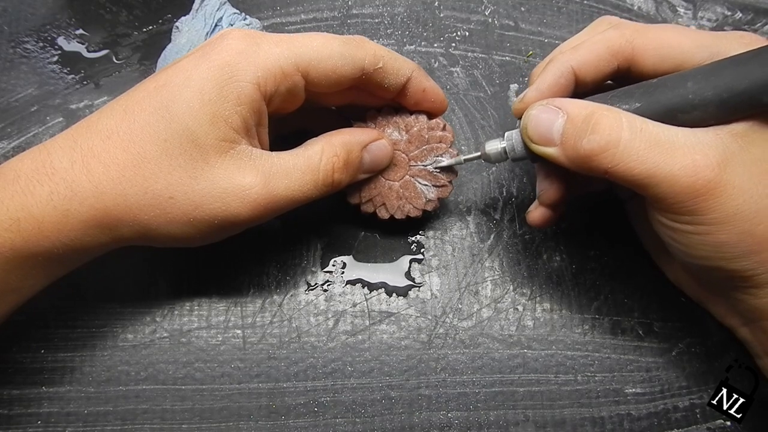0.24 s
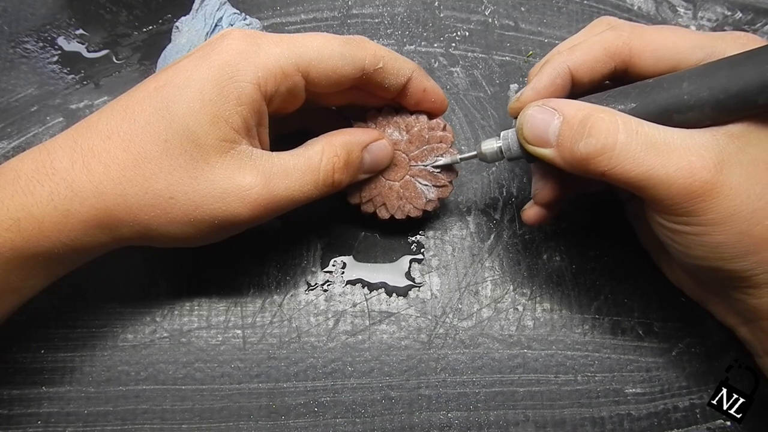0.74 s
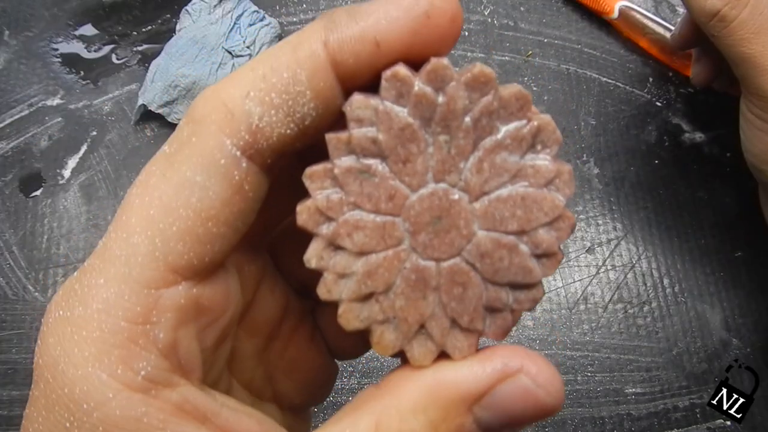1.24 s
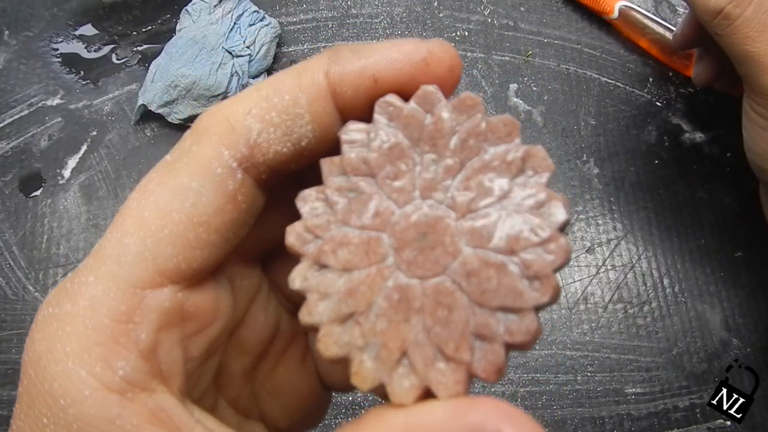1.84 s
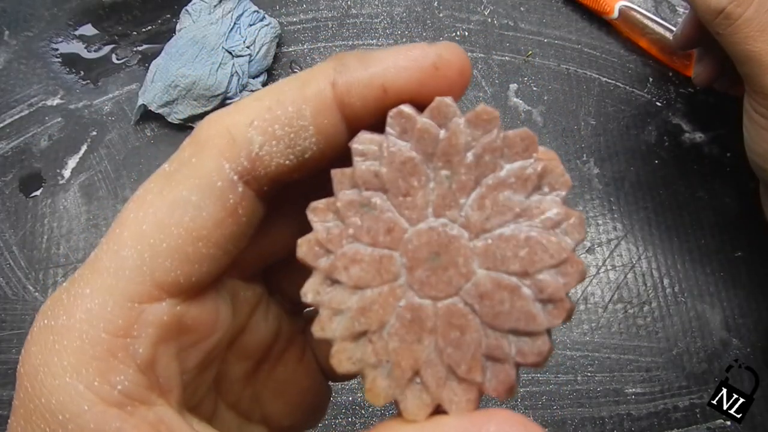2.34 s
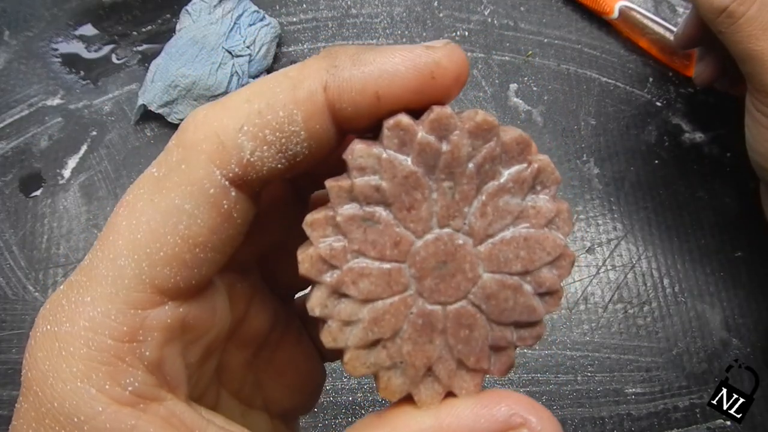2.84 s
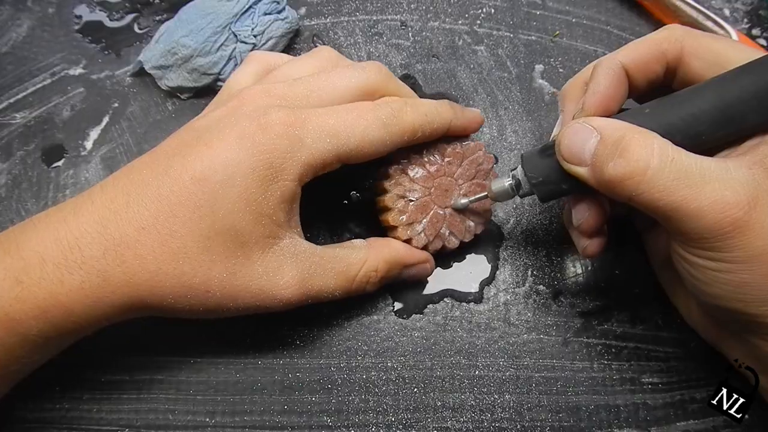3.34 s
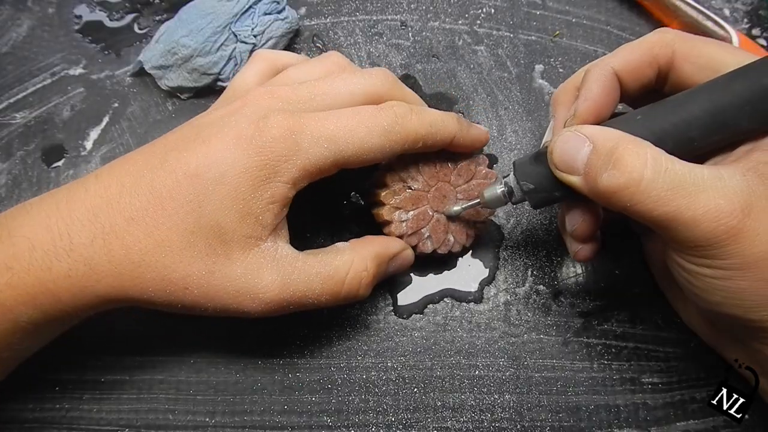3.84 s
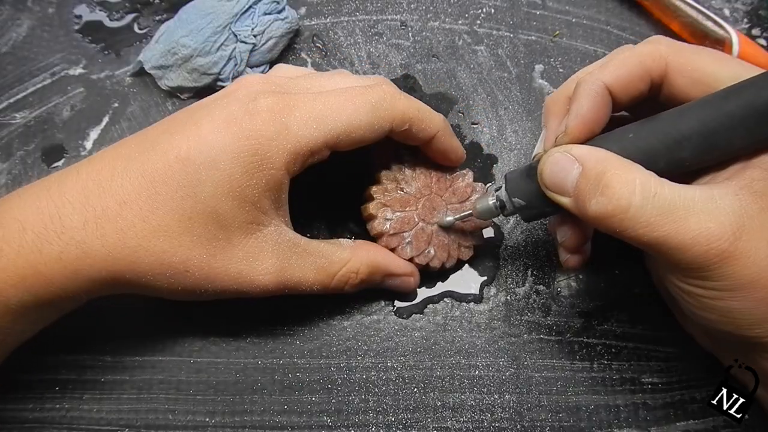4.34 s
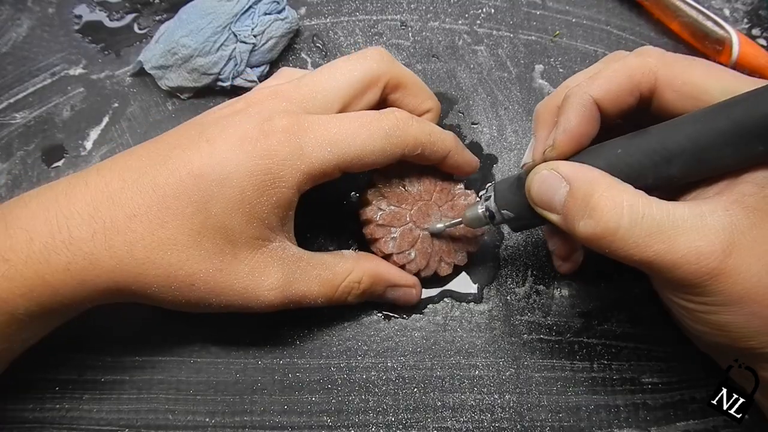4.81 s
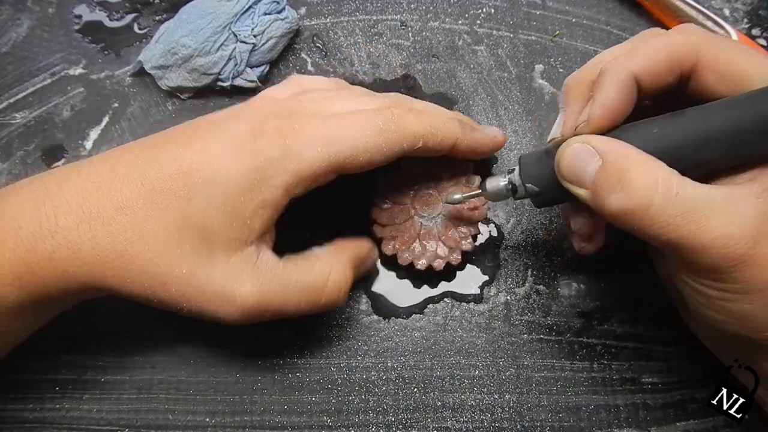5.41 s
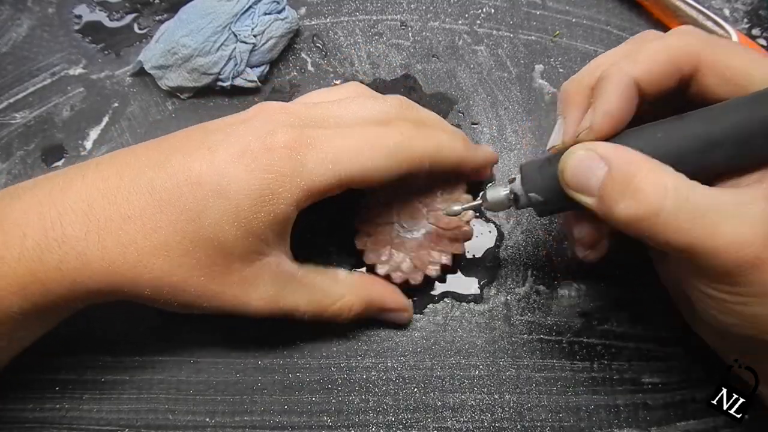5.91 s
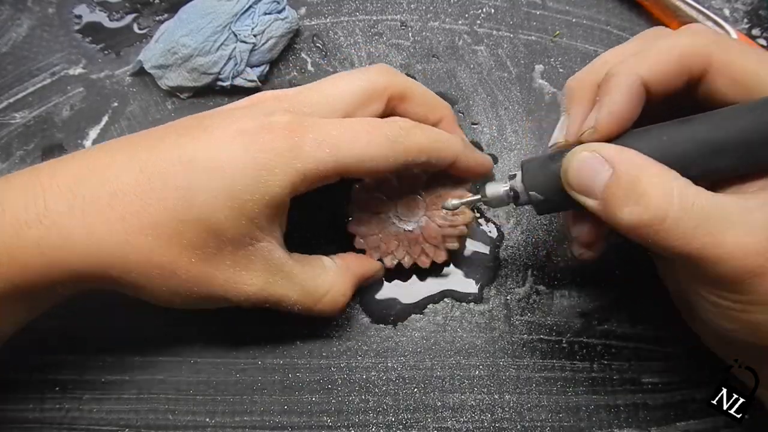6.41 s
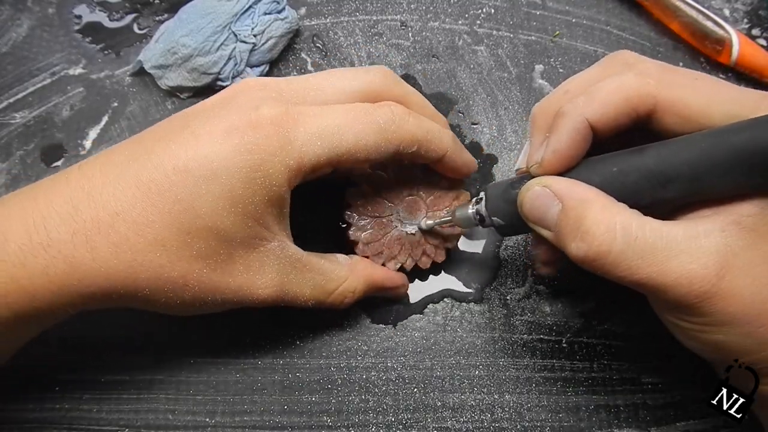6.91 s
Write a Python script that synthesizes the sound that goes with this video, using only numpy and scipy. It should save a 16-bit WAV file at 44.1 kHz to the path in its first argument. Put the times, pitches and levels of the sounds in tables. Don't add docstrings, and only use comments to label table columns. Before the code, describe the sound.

A high-speed handheld grinder drones near 570 hertz with a thin, high motor whine and rough sandy hiss. Three joined passages: a short bright ringing grind, a steady louder buzz, then fluttering drags along grooves with pitch sags and sharp stony rasps. Soft low thuds come from the bench. Close, dry stereo pickup, bright and hissy.

```python
import sys
import numpy as np
from scipy import signal
from scipy.fft import rfft, irfft
from scipy.io import wavfile
from scipy.ndimage import uniform_filter1d

SR = 44100
rng = np.random.default_rng(int(sys.argv[2]) if len(sys.argv) > 2 else 0)


def pcm_store(signal):
    levels = np.round(np.clip(np.atleast_2d(signal), -1, 1) * 32767)
    wavfile.write(sys.argv[1], SR, levels.astype(np.int16).T)


def field_ratio(decibels):
    return 10 ** (np.asarray(decibels, dtype=float) / 20)


N = 315756
HZ = np.maximum(np.fft.rfftfreq(N, 1 / SR), 1)


def unit(x):
    return x / np.sqrt(np.mean(x ** 2))


def on_log(table, column):
    table = np.array(table)
    return np.interp(np.log(HZ), np.log(table[:, 0]), table[:, column])


def colour(spectra, gain):
    return irfft(spectra * gain, N)


def mode(hz, width_hz):
    return 1 / (1 + 1j * (HZ ** 2 - hz ** 2) / (HZ * width_hz))


def walk(rate_hz):
    hold = int(SR / rate_hz)
    held = np.repeat(rng.standard_normal(N // hold + 1), hold)
    slewed = uniform_filter1d(uniform_filter1d(held, hold), hold)[:N]
    return unit(slewed - uniform_filter1d(slewed, 3 * hold))


def lag(x, seconds):
    memory = np.exp(-1 / (seconds * SR))
    return signal.lfilter([1 - memory], [1, -memory], x)


def swells(table):
    t = np.arange(N) / SR
    return sum(db * np.exp(-(2 * (t - s) / length_s) ** 2) for s, db, length_s in table)


def ports(shared, own=None, lead_s=0):
    # frequency in Hz, left minus right in dB, likeness 0-1, left lead in radians.
    port_pair = [(60, -3, .45, 0), (150, -.6, .85, 0), (300, 0, .75, 0), (600, .6, .975, -.1),
                 (2000, 0, .97, -.05), (3100, 0, .75, -.15), (4500, -.5, .6, -.5), (5500, -4.5, .48, -.7),
                 (7000, -2.5, .3, -.8), (7800, -2.5, .4, -2.6), (9000, .8, .55, -4.2),
                 (12200, 2.5, .58, -5.3), (14400, -5, .4, -6.4), (15800, -2, .15, -6.4)]
    likeness = on_log(port_pair, 2)
    side = np.array([[.5], [-.5]])
    lead_rad = on_log(port_pair, 3) + 2 * np.pi * HZ * lead_s
    heard = rfft(shared) * np.exp(1j * side * lead_rad)
    if own is not None:
        heard = np.sqrt(likeness) * heard + np.sqrt(1 - likeness) * rfft(own)
    return heard * field_ratio(side * on_log(port_pair, 1))


def rumble(grit_db, bench_db):
    # frequency in Hz, level in dB per Hz.
    bench_colour = [(12, -43), (20, -13), (102, -11), (171, -6), (190, -11), (250, -35), (420, -120)]
    cage_hz, cage_width_hz, cage_db = 212, 26, -21.5
    noise = rng.standard_normal((6, N))
    cage = colour(ports(noise[0], noise[1:3]), mode(cage_hz, cage_width_hz))
    bumps = field_ratio(4 * walk(20))
    bench = colour(ports(bumps * noise[3], bumps * noise[4:]), field_ratio(on_log(bench_colour, 1)))
    cage_gain = field_ratio(grit_db + cage_db + 1.5 * walk(5.9))
    return cage_gain * unit(cage) + field_ratio(bench_db - 4) * unit(bench)


def strokes():
    # start in s, end in s, final load in Hz of sag.
    drags = [
        (3.1, 3.64, 4.9),
        (3.833, 4.047, 13.9),
        (4.304, 4.551, 9.6),
        (4.704, 5.026, 9.3),
        (5.122, 5.487, 29.6),
        (5.68, 5.966, 34.7),
        (6.226, 6.465, 29.5),
        (6.848, 7.172, 23.8),
    ]
    first_load, edge_s = .46, .02
    contact_lag_s, motor_lag_s = .025, .219
    t, contact, load = np.arange(N) / SR, 0, 0
    for t0, t1, load_hz in drags:
        on = load_hz * np.clip((t - t0) / edge_s, 0, 1) * np.clip((t1 - t) / edge_s, 0, 1)
        contact = contact + on
        load = load + on * (first_load + (1 - first_load) * (t - t0) / (t1 - t0))
    return lag(contact, contact_lag_s), lag(load, motor_lag_s)


def grit(turn, ring_db, air_db, shot):
    # frequency in Hz, dB per Hz in shots 1, 2, 3.
    grit_colour = [(138, -23, -23, -21.5), (440, -7.5, -12, -11.5), (765, -2, -4.5, -5), (1290, 1, -1.5, 0),
                   (2100, 8, 3, 4.5), (3350, 1, 0, -3.5), (3490, 5, 3, 2.5), (5600, -4.5, -3, -6.5),
                   (7300, -9, -4, -2.5), (9200, 0, -1.5, -3.5), (10100, 2, -1.5, -0.5),
                   (12560, 0, -0.5, -3), (14000, -5.5, -8.5, -9), (15900, -14, -12.5, -14)]
    # frequency in Hz, width in Hz, dB in shots 1, 2, 3.
    stone_modes = [(3413, 51, 5.5, -10, -29), (4660, 62, 0, 9, -1), (5567, 53, 0, -20, 13.5),
                   (5540, 1150, -4.5, -22, -4.5), (6264, 170, 3.5, -13, 7.5), (6220, 650, -3.5, -4, -17),
                   (7710, 1070, -10.5, 11, 0.5)]
    flicker_db = [.7, .7, 1.0]
    air_trim_db = [6, 5, 5]
    grains = rng.standard_normal((3, N)) * field_ratio(.5 * rng.exponential(size=(3, N)))
    grains = unit(grains * (1 + .12 * np.cos(2 * np.pi * turn)))
    heard = ports(grains[0], grains[1:])
    tint = field_ratio(on_log(grit_colour, 1 + shot))
    tint = tint / np.sqrt(np.mean(tint ** 2 * (HZ > 2400) * (HZ < 5000)))
    crunch = 0
    for centre_hz in 250 * 2 ** np.arange(0, 6.1, .5):
        octaves_off = abs(np.log2(np.clip(HZ, 250, 16000) / centre_hz))
        share = np.clip(1 - 2 * octaves_off, 0, 1)
        lift_db = air_db + air_trim_db[shot] if centre_hz > 6500 else 0
        crunch = crunch + field_ratio(lift_db + 1.2 * walk(32)) * colour(heard, tint * share)
    ring = 0
    for hz, width_hz, *mode_db in stone_modes:
        ring = ring + field_ratio(mode_db[shot] + 2.5 * walk(25)) * colour(heard, abs(mode(hz, width_hz)) ** 2)
    pressure = field_ratio(flicker_db[shot] * walk(42))
    return pressure * (crunch + field_ratio(np.minimum(ring_db, 11) - 5.0) * unit(ring))


def flares(multiple):
    # time in s, shaft
    # multiple, level in dB, length in s.
    tone_flares = [(3.372, 2, -31, .04), (3.522, 2, -34, .036), (3.644, 2, -32, .039),
                   (3.772, 2, -34, .056), (3.864, 2, -34, .076), (3.955, 2, -32, .036),
                   (4.149, 2, -33, .029), (4.224, 2, -34, .052), (4.336, 2, -34, .09),
                   (4.542, 2, -37, .057), (4.605, 2, -33, .034), (5.014, 2, -32, .18),
                   (5.686, 2, -36, .039), (6.233, 2, -32.5, .098), (6.745, 2, -31, .22),
                   (6.96, 2, -35, .096), (3.42, 3, -27, .027), (3.494, 3, -30, .039),
                   (4.078, 3, -29, .035), (4.48, 3, -33, .05), (4.935, 3, -29, .035),
                   (5.044, 3, -29, .032), (5.145, 3, -31, .03), (5.374, 3, -32, .035),
                   (5.652, 3, -33, .086), (5.83, 3, -29, .043), (5.892, 3, -28, .03), (5.97, 3, -31, .05),
                   (6.369, 3, -31, .03), (6.662, 3, -32, .048),
                   (3.383, 18, -35, .043), (3.505, 18, -31, .057), (3.6, 18, -33, .04),
                    (3.701, 18, -32, .041), (3.827, 18, -32, .03), (4.07, 18, -35, .06),
                    (4.2, 18, -32, .05), (4.282, 18, -33, .036), (4.41, 18, -32, .05), (4.56, 18, -36, .08),
                    (4.66, 18, -30, .06), (4.807, 18, -30.5, .052), (4.906, 18, -35, .036),
                    (5.1, 18, -34, .1), (5.46, 18, -34, .04), (5.57, 18, -31, .06), (6.047, 18, -34, .039),
                    (6.19, 18, -31.5, .09), (6.521, 18, -32, .035), (6.63, 18, -34, .09),
                    (6.787, 18, -30, .051), (6.848, 18, -30, .037), (6.995, 18, -35, .043)]
    t, out = np.arange(N) / SR, np.zeros(N, complex)
    for s, k, db, length_s in tone_flares:
        angle = 2 * np.pi * rng.random()
        near = slice(int((s - 2 * length_s) * SR), int((s + 2 * length_s) * SR))
        swell = np.exp(1j * angle - (2 * (t[near] - s) / length_s) ** 4 / 2)
        out[near] += (k == multiple) * field_ratio(db) * swell
    return out


def whine(turn, grit_db, push_db, sag_hz, shot):
    strong_orders = (1, 2, 3, 18)
    # dB in shots 1, 2, 3, dB per Hz of sag, dB per dB of push, waver in dB.
    hum_levels = [
        (-32.5, -23, -25.7, -0.5254, 0.75, 0.7),
        (-45.5, -33, -42, -0.45, 1, 2.5),
        (-45.5, -36, -41, 0.0347, 1, 2.5),
        (-38.5, -30.5, -41.5, -0.13, 0.3, 0.5),
    ]
    # shaft multiple, dB over grit in shots 1, 2, 3.
    weak_tones = [(2.29, -26, -16, -24), (3.51, -24, -20, -14), (3.875, -13, -8, -9), (4, -18, -16, -12),
                  (5, -18, -17, -22), (5.875, -22, -14, -18), (6, -10, -15, -17), (7, -18, -24, -24),
                  (8, -14, -15, -22), (9, -24, -22, -24), (10, -17, -23, -17), (11, -15, -24, -19)]
    weak_waver_db = [2.5, 2.2, 4]
    waver_factor = [1, .8, 1.7]
    # time in s, level in dB, length in
    # s.
    bit_catches = [(0.01, -3.5, 0.065), (0.117, -7, 0.045), (0.292, -5, 0.084), (0.45, -7, 0.036),
                   (0.606, -10, 0.026), (0.683, -7.9, 0.074), (1.066, -2.5, 0.11), (1.867, 1.5, 0.057),
                   (3.377, -21, 0.049), (3.637, -9, 0.1), (3.878, -12.5, 0.085), (4.03, -12, 0.022),
                   (4.313, -12, 0.039), (4.392, -4.5, 0.21), (4.771, -8.5, 0.16), (5.131, -6, 0.082),
                   (5.219, -2.5, 0.031), (5.272, 8, 0.03), (5.33, -22, 0.13), (5.434, -22, 0.027),
                   (5.501, -28, 0.021), (5.553, -23, 0.023), (5.693, -16.7, 0.027), (5.801, -8, 0.107),
                   (5.876, -16, 0.031), (6.362, -11, 0.034), (6.376, -14, 0.1), (6.443, -22, 0.024),
                   (6.884, -4, 0.15), (7.13, -19.5, 0.19)]
    slip_turns = [.006, .002, .005]
    left_lead_s = [-26e-6, 17e-6, 0]
    jolt_rad_per_db = .09
    hum = []
    for row in hum_levels:
        waver_db = row[5] * waver_factor[shot] * walk(22)
        hum.append(field_ratio(row[shot] + row[3] * sag_hz + row[4] * push_db + waver_db))
    catch_db = swells(bit_catches)
    hum[0] = hum[0] * field_ratio(catch_db) * np.exp(1j * jolt_rad_per_db * catch_db)
    if shot == 2:
        hum = [steady + flares(k) for k, steady in zip(strong_orders, hum)]
    tones = list(zip(strong_orders, hum))
    for row in weak_tones:
        tones.append((row[0], field_ratio(grit_db + row[1 + shot] + weak_waver_db[shot] * walk(32))))
    turn = turn + slip_turns[shot] * walk(70)
    out = sum(np.imag(gain * np.exp(2j * np.pi * (k * turn + rng.random()))) for k, gain in tones)
    stray = .18 * out * np.array([walk(6), walk(6)])
    return np.sqrt(2) * irfft(ports(out + stray, lead_s=left_lead_s[shot]), N)


def scene():
    # start in s, end in s.
    shot_times = [
        (0, .985),
        (.985, 3.344),
        (3.344, 7.16),
    ]
    # grit in dB, ring in dB over grit, air in dB over grit, bench in dB.
    rest_levels = [(-30.5, 8.5, -5.7, -67), (-26.5, -21, -6, -65), (-31.5, -15, -7, -69)]
    free_hz = [578.3, 568.4, 575.07]
    # time in s, level in dB, length in s.
    hand_pushes = [(0.293, 4, 0.3), (0.562, 3.5, 0.055), (0.863, 3, 0.073), (1.008, -3.0, 0.037),
                   (1.3, 2.9, 0.04), (1.443, -3.5, 0.22), (1.603, 3, 0.44), (1.987, 1, 0.037),
                   (2.362, -1.5, 0.041), (2.692, 3, 0.033), (3.068, 2.5, 0.087), (3.212, -1.5, 0.04),
                   (3.296, 2.5, 0.095), (3.439, -4, 0.058), (3.905, -1.7, 0.11), (4.06, -4, 0.072),
                   (4.235, 1.6, 0.14), (4.388, -3, 0.12), (4.542, -4, 0.043), (4.774, -3, 0.039),
                   (4.877, -4.5, 0.048), (4.99, -2.5, 0.041), (5.309, -1.2, 0.31), (5.732, -3, 0.14),
                   (5.979, -4.5, 0.036), (6.328, -3, 0.083), (6.471, -3.5, 0.072), (6.756, 1.5, 0.051),
                   (6.955, -4, 0.031), (7.082, -3, 0.11)]
    # time in s, level in dB, length in s.
    bench_knocks = [(.24, 11, .12), (.4, 7, .08), (.58, 6, .05), (1.32, 12, .06), (1.58, 12, .06),
                    (1.68, 16, .1), (1.87, 14, .07), (2.25, 6, .1), (3.09, 6, .06), (3.33, 12.5, .06),
                    (3.52, 6, .05), (3.73, 10, .07), (4.01, 9, .05), (4.3, 9, .07), (4.62, 7, .05),
                    (4.83, 8, .05), (4.95, 11, .06), (5.85, 7, .04), (6.3, 6, .12), (6.99, 9, .12)]
    grit_db_per_hz, bench_db_per_push_db = -0.1836, 2.1
    ring_load_hz, ring_power, ring_waver_db = 16.6, .7, 2.5
    splice_s = .01
    t, out = np.arange(N) / SR, 0
    push_db, knock_db = swells(hand_pushes), swells(bench_knocks)
    stroked = strokes()
    for shot, (t0, t1) in enumerate(shot_times):
        rest_db, ring_db, air_db, bench_db = rest_levels[shot]
        contact, sag_hz = (x * (shot == 2) for x in stroked)
        grit_db = rest_db + push_db + grit_db_per_hz * sag_hz
        loaded_ring = field_ratio(ring_waver_db * walk(9)) * (contact / ring_load_hz) ** ring_power
        ring_db = 20 * np.log10(field_ratio(ring_db) + loaded_ring)
        turn = np.cumsum(free_hz[shot] - sag_hz) / SR
        tool = whine(turn, grit_db, push_db, sag_hz, shot)
        tool = tool + field_ratio(grit_db + 1.0) * grit(turn, ring_db, air_db, shot)
        low = rumble(grit_db, bench_db + bench_db_per_push_db * push_db + knock_db)
        start = 1 if shot == 0 else np.clip((t - t0) / splice_s + .5, 0, 1)
        end = 1 if shot == 2 else np.clip((t1 - t) / splice_s + .5, 0, 1)
        out = out + start * end * (tool + low)
    return out


def roll_off(x):
    return signal.sosfilt(signal.butter(12, 16030, fs=SR, output="sos"), x)


def record(dry):
    top_hz = 15760
    mix = colour(rfft(dry), HZ < top_hz)
    return roll_off(mix)


dry = scene()
out = record(dry)
pcm_store(out)
```